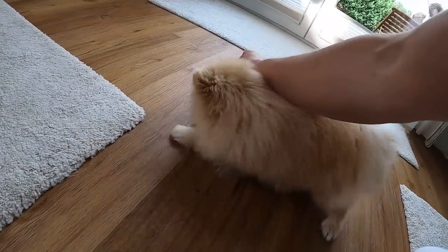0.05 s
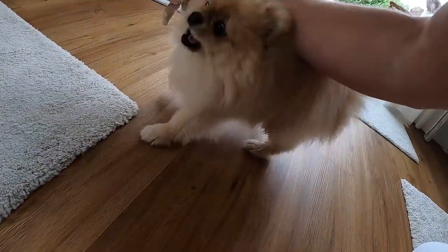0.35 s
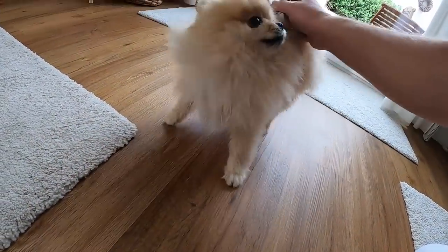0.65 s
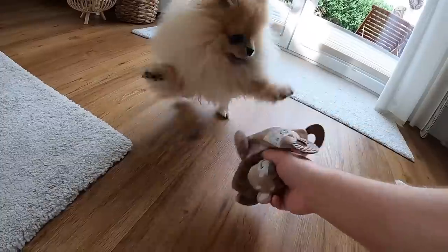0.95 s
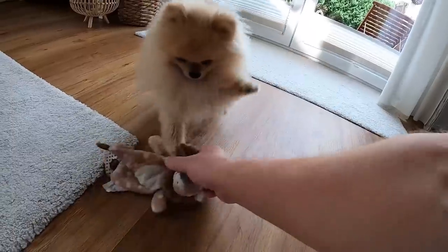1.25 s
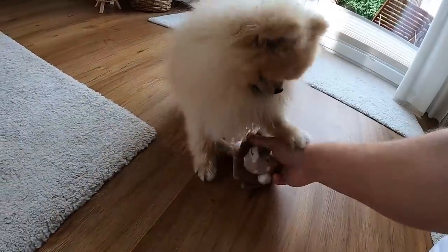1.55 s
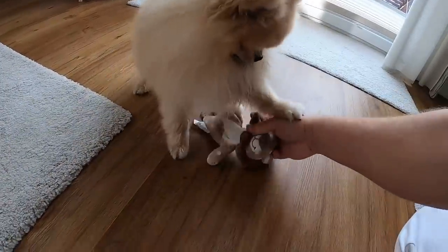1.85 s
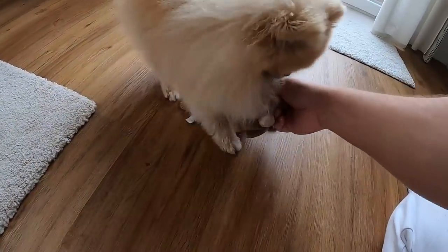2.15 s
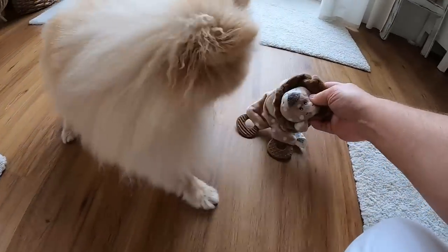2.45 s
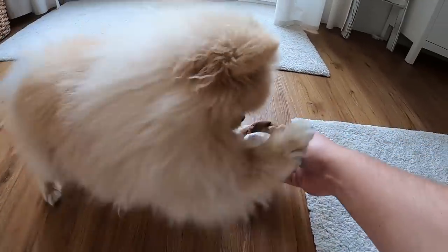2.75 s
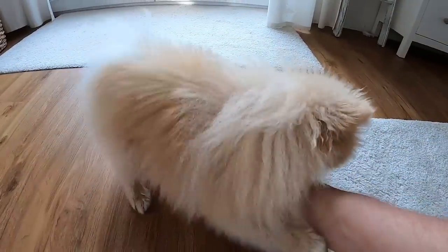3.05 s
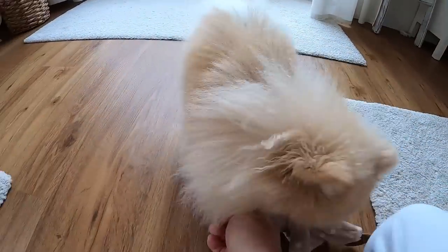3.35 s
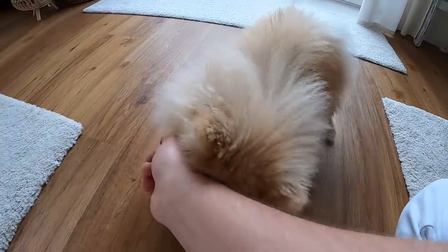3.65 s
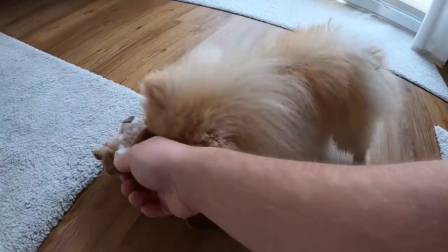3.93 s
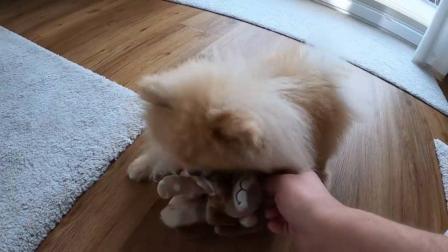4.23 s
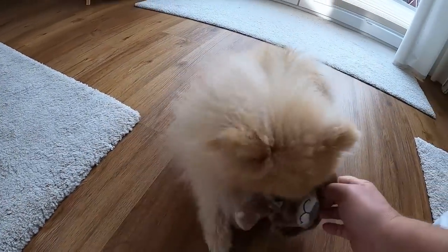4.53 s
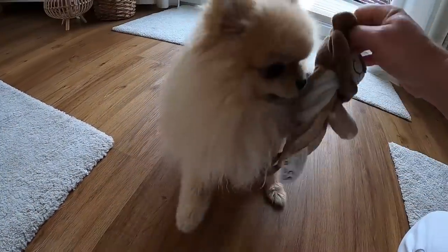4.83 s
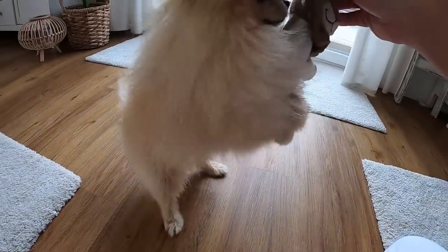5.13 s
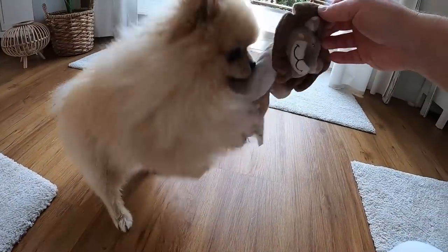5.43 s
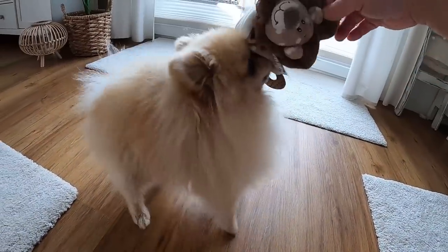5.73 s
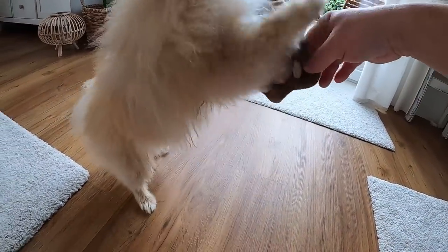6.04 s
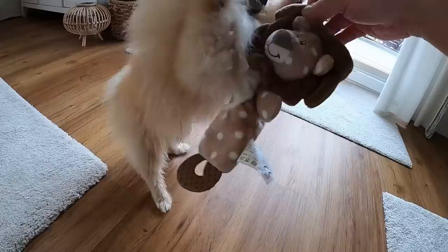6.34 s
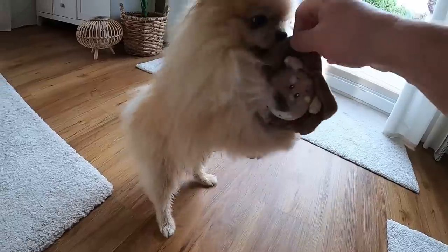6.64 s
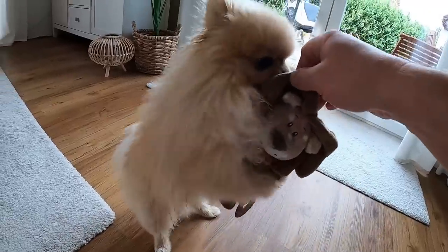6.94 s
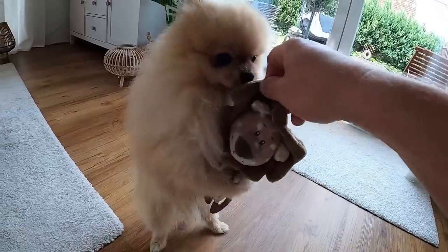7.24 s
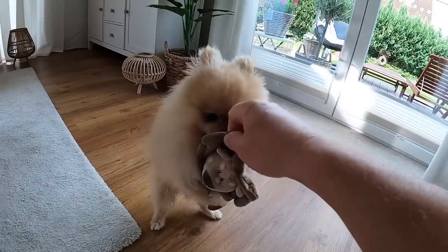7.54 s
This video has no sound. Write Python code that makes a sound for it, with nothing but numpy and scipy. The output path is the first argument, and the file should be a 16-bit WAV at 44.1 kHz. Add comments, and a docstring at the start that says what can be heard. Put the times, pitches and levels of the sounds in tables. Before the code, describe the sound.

Dense, irregular foil crinkling and snapping from a dog's plush toy, mixed with soft thumps, clicks and scrapes on floorboards.

```python
"""A small dog tugs and bites a foil-lined plush toy on a wooden living-room floor, over low rumble.
From the start each squeeze crackles the foil and snaps its large facets; paws thud and shake the floor,
claws and hard bits of the toy knock and skid, and the toy scrapes over the boards. From 1.4 s sliding
foil adds a few airy spurts. The heaviest thud lands at 4.1 s. After 5.2 s the knocks stop, leaving
mostly foil and a few faint thuds. The room answers briefly throughout."""
import sys
import numpy as np
from scipy import signal
from scipy.fft import rfft, irfft
from scipy.io import wavfile
from scipy.ndimage import uniform_filter1d, map_coordinates

SR = 44100
rng = np.random.default_rng(int(sys.argv[2]) if len(sys.argv) > 2 else 0)


def waveform_to_disk(signal):
    """Save audio, clipped to [-1, 1], as 16-bit WAV at the path in sys.argv[1]."""
    frames = np.transpose(np.atleast_2d(signal))
    scaled = np.clip(frames, -1, 1) * 32767
    samples = np.round(scaled).astype(np.int16)
    wavfile.write(sys.argv[1], SR, samples)


N = 334410
TIME = np.arange(N) / SR

# foil spectrum: freq_hz, level_db
FOIL_SPECTRUM = [(200, 4.5), (600, -1), (950, -0.5), (1450, 2.5), (2100, -0.5), (3200, 0.5), (4200, 0),
                 (5500, -3.5), (6500, -3.5), (7800, -1.5), (9200, -9), (12000, -10), (15500, -22.5)]
# struck floorboard spectrum: freq_hz, level_db
BOARD_SPECTRUM = [(100, -14), (420, -8), (700, 6.5), (1100, -1.5), (1700, 1.5), (3000, 4), (6000, -12),
                  (14000, -26)]
# paws and soft toy landing: start_s, boom_db, boom_hz, shake_db
LANDINGS = [(0.125, -30, 443, -50), (0.346, -43, 217, -56), (0.621, -35.5, 483, -44.5),
            (1.059, -41, 217, -59), (1.133, -41, 195, -73), (1.205, -37, 233, -53), (1.31, -36, 234, -51.5),
            (1.634, -38, 184, -54), (2.206, -34, 245.6, -56), (2.5, -56, 180, -59),
            (2.595, -36.5, 517, -59), (2.803, -74, 152, -56), (2.955, -42.5, 185.7, -53),
            (3.493, -39, 186, -58), (3.882, -43, 181, -57), (3.939, -56, 180.4, -53.5),
            (4.132, -24.5, 214, -45), (4.19, -51, 194, -40.5), (4.661, -39, 250, -68),
            (5.015, -52, 182, -49), (5.136, -51, 180, -50), (5.221, -39, 198, -50), (6.21, -52, 120, -51.5),
            (6.275, -54, 184, -58), (6.575, -56, 182, -56)]


def amp(db):
    """Decibels to gain."""
    return 10 ** (np.asarray(db) / 20)


def unit(x):
    """Scale to unit rms."""
    return x / np.sqrt(np.mean(x ** 2) + 1e-20)


def read(points, hz):
    """Interpolate on a log-frequency axis."""
    freqs_hz, values = np.transpose(points)
    return np.interp(np.log(hz + 1), np.log(freqs_hz + 1), values)


def follow(curve):
    """Level curve to per-sample gain."""
    return amp(np.interp(TIME, *np.transpose(curve)))


def add(mix, start_s, sound):
    """Mix a sound in at start_s."""
    part = mix[max(round(start_s * SR), 0):][:len(sound)]
    part += sound[:len(part)]


def tint(x, spectrum):
    """Filter by a spectrum."""
    return irfft(rfft(x) * amp(read(spectrum, np.fft.rfftfreq(len(x), 1 / SR))), len(x))


def blow(spectrum, ripple_db, size=1024, knots=24):
    """Minimum-phase response of a struck body; each spot has its own spectral ripple."""
    hz = np.fft.rfftfreq(size, 1 / SR)
    ripple = np.interp(np.sqrt(hz), np.linspace(0, np.sqrt(hz[-1]), knots), rng.standard_normal(knots))
    cepstrum = irfft(np.log(amp(read(spectrum, hz) + ripple_db * ripple)))
    cepstrum[1:size // 2] *= 2
    cepstrum[size // 2 + 1:] = 0
    return irfft(np.exp(rfft(cepstrum)))


def ring(x, hz, q):
    """One damped mode, scaled to the energy of 2 ms at unit power."""
    mode = signal.lfilter(*signal.iirpeak(min(hz, SR / 4), max(q, .7), SR), x)
    return mode / np.linalg.norm(mode) * np.sqrt(SR * .002)


def grains(shapes, per_s, spread_db):
    """Random clicks, many small and few large, each with one of the shapes."""
    at = np.flatnonzero(rng.random(N) < per_s / SR)
    levels_db = spread_db * np.minimum(rng.exponential(1, N), 3.7)
    sizes = (amp(levels_db) * rng.choice([-1, 1], N))[at]
    which = rng.integers(0, len(shapes), N)[at]
    out = np.zeros(N)
    for k, shape in enumerate(shapes):
        clicks = np.zeros(N)
        clicks[at[which == k]] = sizes[which == k]
        out += signal.oaconvolve(clicks, shape)[:N]
    return out


def steady(x, size=2600):
    """Level the slow power, keep the spikes."""
    window = signal.windows.hann(size)
    power = abs(signal.oaconvolve(x ** 2, window / window.sum(), "same"))
    return x / np.sqrt(power + 1e-12)


def strokes(rows, attack_s, release_s, sag_db_per_s=0):
    """Joint gain of strokes: each swells up to its start, sags while held, then dies."""
    power = np.zeros(N)
    t = TIME[:SR] - attack_s
    for start_s, length_s, level_db in rows:
        shape = np.clip(1 + t / attack_s, 0, 1) * np.exp(-np.maximum(t - length_s, 0) / release_s)
        add(power, start_s - attack_s, (amp(level_db - sag_db_per_s * t) * shape) ** 2)
    return np.sqrt(power)


def background(rumble_db=1, jolt_s=0.015, air_db=-62, hum_hz=99.3, hum_db=-71.5):
    """Handling rumble and a floor jolt per landing, over still room air and a faint hum."""
    # spectra: freq_hz, level_db
    rumble_spectrum = [(10, -25), (25, -7.5), (45, -4.5), (75, -5.5), (130, -11), (250, -17), (600, -47),
                       (3000, -78)]
    air_spectrum = [(30, -3.5), (100, -11), (200, 4), (400, -9.5), (850, -14.5), (1400, -3.5),
                    (3500, -18.5), (8000, -19.5), (12500, -44)]
    # handling, settling near the end: time_s, level_db
    handling = [(0.0, -73), (6.6, -71.5), (7.0, -86)]
    jolts = [(start_s, jolt_s, shake_db) for start_s, _, _, shake_db in LANDINGS]
    shake = np.hypot(strokes(jolts, attack_s=0.016, release_s=0.04), follow(handling))
    rumble = shake * steady(tint(rng.standard_normal(N), rumble_spectrum), size=4000)
    air = unit(tint(rng.standard_normal(N), air_spectrum))
    hum = unit(np.sin(2 * np.pi * hum_hz * TIME))
    return amp(rumble_db) * rumble + amp(air_db) * air + amp(hum_db) * hum


def crushing():
    """How hard the foil is crushed: squeezes on top of a hand's grip."""
    # bites and tugs: start_s, length_s, level_db
    squeezes = [(0.103, 0.166, -47), (0.277, 0.18, -40.5), (0.553, 0.02, -39.5), (0.977, 0.084, -41.5),
                (1.1363, 0.035, -34.5), (1.2, 0.185, -41.5), (1.409, 0.074, -42), (1.636, 0.03, -37),
                (1.868, 0.04, -50), (2.023, 0.067, -45.5), (2.141, 0.081, -48), (2.373, 0.075, -46),
                (2.491, 0.038, -50), (2.597, 0.05, -49), (2.851, 0.039, -43.5), (3.64, 0.041, -47),
                (3.775, 0.2, -44.5), (4.134, 0.0087, -33.5), (4.233, 0.166, -41), (4.472, 0.036, -43.5),
                (4.66, 0.031, -38.5), (4.75, 0.16, -49.5), (4.8547, 0.35, -42), (5.137, 0.09, -42),
                (5.3346, 0.058, -40.5), (5.502, 0.13, -43), (6.268, 0.084, -44.5), (6.435, 0.054, -43),
                (6.569, 0.175, -41), (6.946, 0.041, -46.5), (7.124, 0.063, -47.5), (7.2632, 0.061, -49.5),
                (7.568, 0.02, -50.5)]
    # rustle under the grip: time_s, level_db
    grip = [(0.05, -60), (0.2, -50.5), (0.92, -51), (1.55, -50), (1.95, -55.5), (2.7, -49.5), (3.45, -52.5),
            (4.6, -48.5), (5.22, -44), (5.27, -49.5), (5.46, -54), (5.68, -48.5), (5.9, -49), (5.97, -79),
            (6.07, -47.5), (6.55, -51.5), (6.88, -60.5), (7.58, -58.5)]
    return np.hypot(strokes(squeezes, attack_s=0.015, release_s=0.013, sag_db_per_s=9.5), follow(grip))


def rattle(x, after_db, decay_s, size=600):
    """One flip tips its neighbours: a dying burst of copies follows; total energy is kept."""
    burst = rng.standard_normal(size) * (rng.random(size) < .15) * np.exp(-TIME[:size] / decay_s)
    burst *= amp(after_db) / (np.linalg.norm(burst) + 1e-9)
    burst[0] += 1
    rattled = np.convolve(x, burst)
    return rattled * np.linalg.norm(x) / np.linalg.norm(rattled)


def clumps(spread_db, clump_s):
    """One crease sets off others: a random factor on the flip rate, mean one."""
    knots = rng.standard_normal(4000)
    rate = amp(spread_db * np.interp(TIME / clump_s, np.arange(len(knots)), knots))
    return rate / rate.mean()


def shifting_folds(x, patch_db=3.0, patch_s=.022, patch_hz=700):
    """Folds open and close, changing the colour in short patches."""
    hz, t, bins = signal.stft(x, SR, nperseg=256, noverlap=192)
    folds = rng.standard_normal((200, 2000))
    grid = np.meshgrid(hz / patch_hz, t / patch_s, indexing="ij")
    patches = unit(map_coordinates(folds, grid, order=1, mode="wrap"))
    return signal.istft(bins * unit(amp(patch_db * patches)), SR, nperseg=256, noverlap=192)[1][:N]


def crinkle(gain_db=-1.5, base_per_s=620, facet_hz=2900, span_octaves=0.9, plush_db=-11.5):
    """Small facets, dead or ringing, flip more often under a harder crush; the plush rubs softly."""
    crush = crushing()
    facets = []
    for pitch_hz in facet_hz * 2 ** np.linspace(-span_octaves, span_octaves, 48):
        q = 1.6 * np.exp(0.91 * rng.standard_normal())
        flip = ring(blow(FOIL_SPECTRUM, ripple_db=3.5), pitch_hz, q)
        facets.append(rattle(flip, after_db=2.0, decay_s=0.0038))
    per_s = base_per_s * (.6 + .5 * np.sqrt(unit(crush))) * clumps(spread_db=7.0, clump_s=0.0024)
    flips = steady(grains(facets, per_s, spread_db=3.5), size=3000)
    plush = unit(tint(rng.standard_normal(N), FOIL_SPECTRUM))
    return amp(gain_db) * crush * shifting_folds(flips + amp(plush_db) * plush)


def ticks(gain_db=-7, centre_hz=7000):
    """The tiniest creases tick, dry and bright, loudest under a hard squeeze."""
    crush = crushing()
    creases = (ring(blow(FOIL_SPECTRUM, ripple_db=4.0), centre_hz, q=0.7) for _ in range(20))
    shapes = [rattle(crease, after_db=-4.5, decay_s=0.0011) for crease in creases]
    stream = steady(grains(shapes, per_s=240, spread_db=5.5), size=5000)
    return amp(gain_db) * crush * unit(crush) ** 0.52 * stream


def snaps(highpass_hz=1100):
    """A large facet buckles, rings briefly and rattles the foil around it."""
    # buckling facets: start_s, level_db, pitch_hz
    buckles = [(0.1015, -29.5, 3020), (0.1293, -27.5, 2670), (0.277, -32, 2000), (0.3115, -26, 3250),
               (0.348, -29, 3600), (0.3787, -30.5, 1870), (0.3868, -31, 2900), (0.423, -32.5, 4630),
               (0.561, -29.5, 5400), (0.573, -27.5, 4060), (0.9806, -28.5, 3600), (1.022, -29, 2840),
               (1.043, -23, 3500), (1.1352, -26.5, 3200), (1.1464, -27.5, 3730), (1.272, -29, 2400),
               (1.283, -24.5, 2280), (1.344, -24.5, 1810), (1.4181, -28.5, 3670), (1.4414, -31, 3000),
               (1.468, -27.5, 6000), (1.5034, -37, 3780), (1.646, -28.5, 2380), (1.759, -33.5, 1920),
               (1.8667, -36.5, 5610), (2.0244, -30.5, 4240), (2.045, -33, 4200), (2.064, -35, 3200),
               (2.1378, -24, 2595), (2.2167, -36, 2300), (2.297, -38, 2400), (2.4896, -34.5, 3300),
               (2.5123, -33, 2900), (2.5504, -29.5, 2430), (2.5974, -38, 2800), (2.855, -25, 2398),
               (2.8934, -34, 2910), (2.905, -26.5, 3044), (3.293, -38, 2250), (3.338, -32.5, 4200),
               (3.443, -41, 3100), (3.5188, -37, 3450), (3.81, -28, 2726), (3.9105, -33, 2049),
               (4.0491, -31.5, 2700), (4.085, -25.5, 2680), (4.133, -21.5, 3200), (4.163, -25.5, 3200),
               (4.2405, -32, 2400), (4.369, -27, 2310), (4.4283, -28, 2940), (4.7, -27, 3680),
               (4.747, -36, 3600), (4.769, -32, 3900), (4.785, -35, 4000), (4.8549, -22.5, 3367),
               (4.9002, -35, 4230), (5.0034, -25.5, 7100), (5.0435, -25, 5600), (5.138, -24, 2900),
               (5.145, -29.5, 2880), (5.193, -31.5, 2860), (5.3584, -34, 3850), (5.6045, -33, 2780),
               (5.7118, -37, 3220), (5.761, -26.5, 4350), (5.8156, -28.5, 7300), (5.8173, -27, 3020),
               (5.8938, -32, 3630), (5.9953, -41.5, 6150), (6.093, -36, 2500), (6.1005, -30.5, 2740),
               (6.2855, -34.5, 1650), (6.414, -37, 5940), (6.5097, -35.5, 2100), (6.628, -33, 2280),
               (6.683, -32, 3600), (6.7493, -27, 3540), (6.792, -40, 2180), (6.8008, -31, 2200),
               (6.9043, -43, 3400), (6.946, -37, 2730), (6.9757, -37, 3200), (6.9874, -38, 4220),
               (7.0806, -42, 3730), (7.124, -32.5, 3440), (7.1486, -26, 2320), (7.2637, -33, 3440),
               (7.2868, -39, 3020), (7.4197, -31, 3200), (7.542, -39.5, 3900), (7.569, -34, 4850)]
    out = np.zeros(N)
    for start_s, level_db, pitch_hz in buckles:
        flip = amp(level_db) * ring(blow(FOIL_SPECTRUM, ripple_db=3.0), pitch_hz, q=1.7)
        add(out, start_s, rattle(flip, after_db=5.0, decay_s=0.0019))
    # a small sheet radiates little bass
    return signal.lfilter(*signal.butter(2, highpass_hz, "high", fs=SR), out)


def covered(x, above_hz=6000):
    """The foil's treble comes and goes as fur and hand cover it."""
    # treble shelf: time_s, gain_db
    cover = [(0.0, 2), (1.1, -1), (2.0, 0.5), (2.65, -2), (3.85, -4), (4.3, -8), (4.7, -3.5), (5.35, -6.5),
             (5.85, -1), (7.58, -3)]
    treble = signal.sosfiltfilt(signal.butter(2, above_hz, "high", fs=SR, output="sos"), x)
    return x + (follow(cover) - 1) * treble


def thuds(gain_db=0.5):
    """Soft landings push the floor: a short, dull boom."""
    # paw blow: freq_hz, level_db
    paw_spectrum = [(30, 13), (70, -26), (130, -4.5), (185, 5.5), (260, -0.5), (430, 2.5), (700, -17.5),
                    (2000, -48), (8000, -63)]
    out = np.zeros(N)
    for start_s, boom_db, boom_hz, _ in LANDINGS:
        push = ring(blow(paw_spectrum, ripple_db=2, size=4096, knots=90), boom_hz, q=2.2)
        add(out, start_s, amp(boom_db) * push / abs(push).max())
    return amp(gain_db) * out


def knocks(cutoff_ratio=3.8):
    """A hard tip rings a board for a few cycles; the lower the ring, the blunter the blow."""
    # claws and hard toy parts: start_s, level_db, pitch_hz
    strikes = [(0.1267, -23, 1020), (0.1297, -26, 730), (0.6205, -35.5, 606), (1.2113, -23, 680),
               (1.443, -32.5, 940), (1.6351, -33.5, 788), (1.6464, -26.5, 1030), (1.7608, -25.5, 880),
               (1.9118, -25, 1020), (1.926, -38, 892), (2.027, -33, 765), (2.1387, -16.5, 911),
               (2.3675, -25.5, 794), (2.3962, -28.5, 858.5), (2.552, -26.5, 838), (2.5954, -31, 620),
               (2.8523, -25, 800), (3.0843, -28.5, 775), (3.6054, -23, 840), (3.91, -27, 800),
               (4.011, -28.5, 744.5), (4.085, -24.5, 785), (4.107, -25.5, 766), (4.1273, -18, 670),
               (4.1386, -18.5, 626), (4.5504, -28, 768.5), (4.6645, -27.5, 795.7), (5.2234, -30, 844)]
    out = np.zeros(N)
    for start_s, level_db, pitch_hz in strikes:
        lowpass = signal.butter(2, cutoff_ratio * pitch_hz, fs=SR)
        blunt = signal.lfilter(*lowpass, blow(BOARD_SPECTRUM, ripple_db=4.5))
        add(out, start_s, -amp(level_db) * ring(blunt, pitch_hz, q=3.44))
    return out


def skids(per_s=140, jitter=0.883, uneven_db=4.0, lowpass_hz=3400):
    """Stick and slip: a fast, uneven run of soft blows, each on a different spot of the board."""
    # hard toy part chattering: start_s, end_s, level_db, pitch_hz, log_pitch_scatter
    runs = [(0.13, 0.192, -51, 805, 0.1), (0.2, 0.267, -46, 1130, 0.01), (1.194, 1.268, -57, 730, 0.1),
            (1.659, 1.799, -51.5, 794, 0.12), (1.921, 2.078, -51.5, 880, 0.17),
            (2.135, 2.2, -47, 810, 0.098), (2.508, 2.599, -47, 744, 0.19), (3.09, 3.176, -45, 880, 0.24),
            (3.531, 3.598, -47, 846, 0.2), (3.61, 3.764, -51, 1040, 0.41), (3.846, 3.949, -47.5, 946, 0.12),
            (4.554, 4.644, -44, 786, 0.12), (4.643, 4.681, -38.5, 853.3, 0.14),
            (4.712, 4.783, -45, 805, 0.13)]
    lowpass = signal.butter(2, lowpass_hz, fs=SR)
    out = np.zeros(N)
    for start_s, end_s, level_db, pitch_hz, scatter in runs:
        slips = np.zeros(round((end_s - start_s) * SR) + 1024)
        for slot_s in np.arange(0, end_s - start_s, 1 / per_s):
            strike = blow(BOARD_SPECTRUM, ripple_db=4.5)
            slip = ring(strike, pitch_hz * np.exp(scatter * rng.standard_normal()), q=5)
            slip_s = slot_s + jitter * rng.random() / per_s
            add(slips, slip_s, amp(uneven_db * rng.standard_normal()) * slip)
        add(out, start_s, amp(level_db) * unit(signal.lfilter(*lowpass, slips)))
    return out


def scrape(gain_db=-4, lift_db=-58):
    """The dragged toy rubs over the wood grain; below a light touch it lifts clear."""
    # one slip: freq_hz, level_db
    slip_spectrum = [(100, -13), (300, -6.5), (500, -8.5), (700, -1), (950, -2.5), (1250, -5), (2000, -15),
                     (4000, -15), (12000, -57)]
    # rubs on boards or paws: start_s, length_s, level_db
    drags = [(0.14, 0.24, -43.5), (0.645, 0.01, -41.5), (1.195, 0.21, -43), (1.64, 0.18, -43),
             (1.92, 0.17, -44), (2.145, 0.09, -43), (2.555, 0.11, -47.5), (2.85, 0.43, -43.5),
             (3.49, 0.087, -47), (3.62, 0.15, -39), (3.83, 0.12, -41.5), (4.56, 0.2, -49), (5.05, 0.2, -50),
             (6.45, 0.089, -55.5), (6.57, 0.2, -53)]
    # light rubbing between drags: time_s, level_db
    touch = [(0.0, -50.5), (0.45, -51.5), (0.8, -60.5), (1.3, -59.5), (2.3, -45.5), (2.75, -52), (4.5, -50),
             (5.0, -66), (5.8, -63), (5.98, -73), (6.2, -59), (7.1, -59)]
    slips = [blow(slip_spectrum, ripple_db=3) for _ in range(10)]
    drag = np.hypot(strokes(drags, attack_s=0.031, release_s=0.0074, sag_db_per_s=8), follow(touch))
    contact = drag / (drag + amp(lift_db))
    return amp(gain_db) * drag * contact * steady(grains(slips, per_s=600, spread_db=3))


def sizzle():
    """Foil slides over foil: short, airy spurts of very fine creases."""
    # one fine crease: freq_hz, level_db
    crease_spectrum = [(500, -35), (4000, -10), (6500, -5.5), (7600, 0.5), (9000, -9.5), (12000, -22),
                       (15500, -35)]
    # foil slides: start_s, length_s, level_db
    slides = [(1.442, 0.028, -41), (3.85, 0.089, -47), (5.338, 0.0071, -38), (5.815, 0.024, -45),
              (6.57, 0.14, -63)]
    creases = [blow(crease_spectrum, ripple_db=3) for _ in range(10)]
    spurts = strokes(slides, attack_s=0.017, release_s=0.0049)
    return spurts * steady(grains(creases, per_s=1500, spread_db=4.0))


def room(x, wet_db, taps_per_s=3000, first_s=0.0041, build_s=0.0011, size=24000):
    """Sparse reflections build up, then die band by band."""
    # living-room decay: freq_hz, t60_s
    decay = [(100, 0.48), (700, 0.17), (3000, 0.2), (8000, 0.31), (15000, 0.27)]
    taps = rng.standard_normal(size) * (rng.random(size) < taps_per_s / SR)
    hz, t, bins = signal.stft(taps, SR, nperseg=256)
    bins = bins * amp(-60 * t / read(decay, hz)[:, None])
    tail = signal.istft(bins, SR, nperseg=256)[1][:size]
    tail *= np.clip((TIME[:size] - first_s) / build_s, 0, 1)
    return x + amp(wet_db) * signal.oaconvolve(x, tail / np.linalg.norm(tail))[:N]


def stereo_width(mid, width=0.13, lean=0.34, lean_above_hz=11500):
    """Nearly mono in bass and mids, diffuse in the top treble and stronger there on the right."""
    # side level: freq_hz, level_db
    side_level = [(100, -15), (500, -16.5), (1500, -43), (3800, -37), (4800, -7), (8000, -3), (10700, 0),
                  (12000, 15), (16000, 8)]
    # the left-right phase wanders from tick to tick
    wander = unit(uniform_filter1d(rng.standard_normal(N), 100))
    diffuse = tint(np.imag(signal.hilbert(mid)) * np.tanh(2 * wander), side_level)
    treble = signal.sosfiltfilt(signal.butter(8, lean_above_hz, "high", fs=SR, output="sos"), mid)
    side = width * diffuse - lean * treble
    return np.array([mid + side, mid - side])


def scene():
    """Toy, floor and paws in the room, in stereo."""
    foil = covered(crinkle() + ticks() + snaps()) + sizzle()
    toy = room(foil, wet_db=-11.5)
    boards = room(knocks() + skids() + scrape(), wet_db=-7.0)
    paws = room(thuds(), wet_db=-3.5)
    return stereo_width(toy + boards + paws + background())


def record(dry):
    """Steep low-pass at 15.7 kHz."""
    lowpass = signal.firwin(401, 15700, window=("kaiser", 9), fs=SR)
    return signal.oaconvolve(dry, lowpass[None], "same")


dry = scene()
out = record(dry)
waveform_to_disk(out)
```